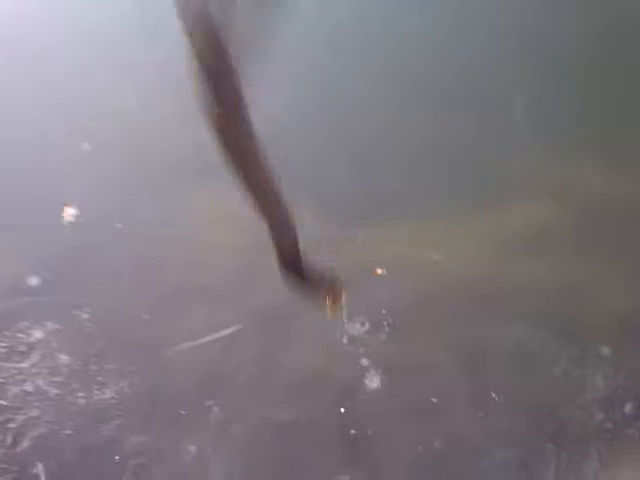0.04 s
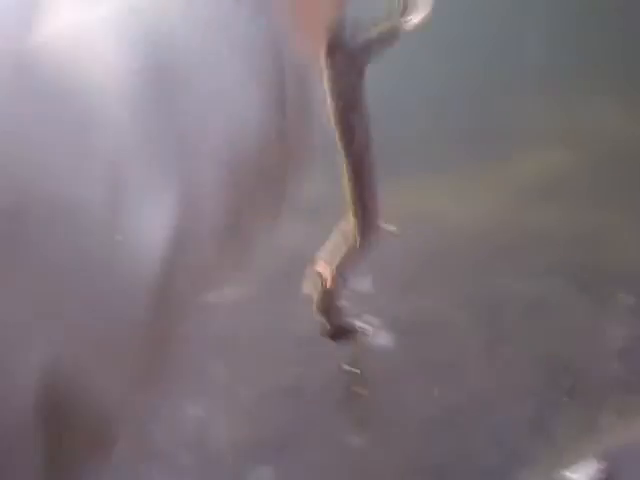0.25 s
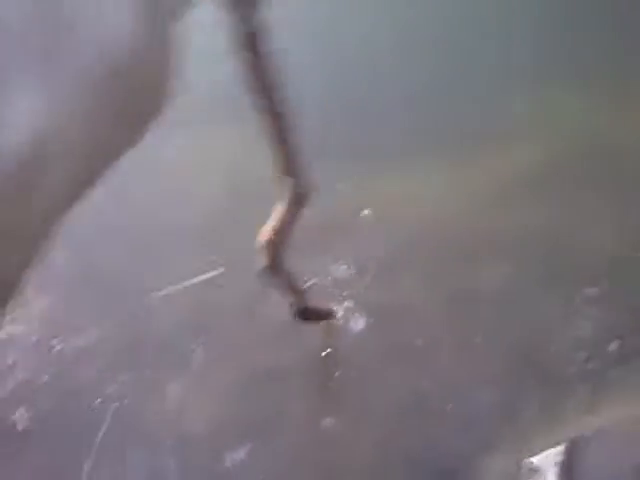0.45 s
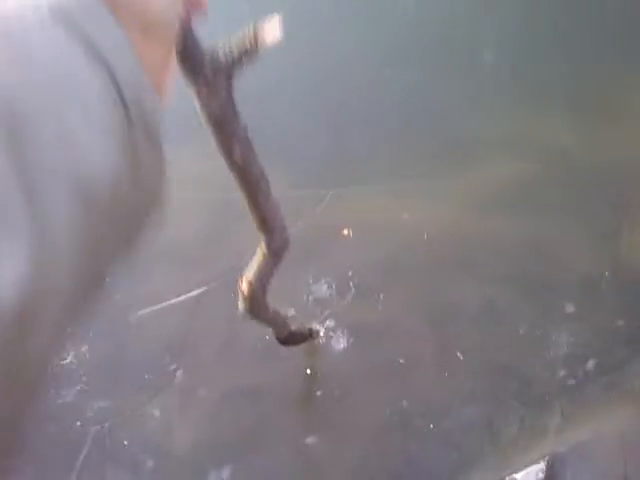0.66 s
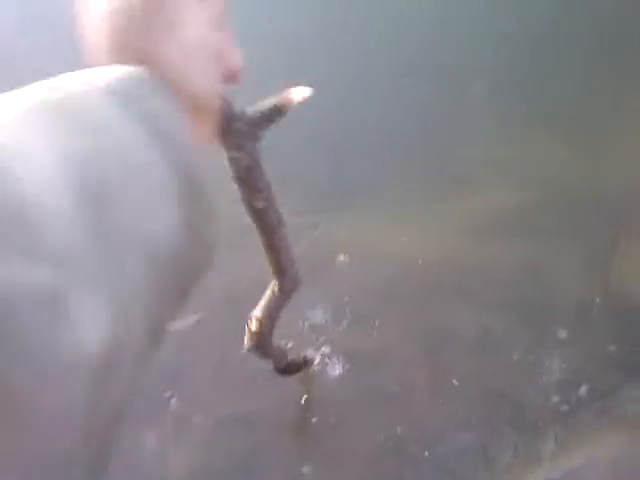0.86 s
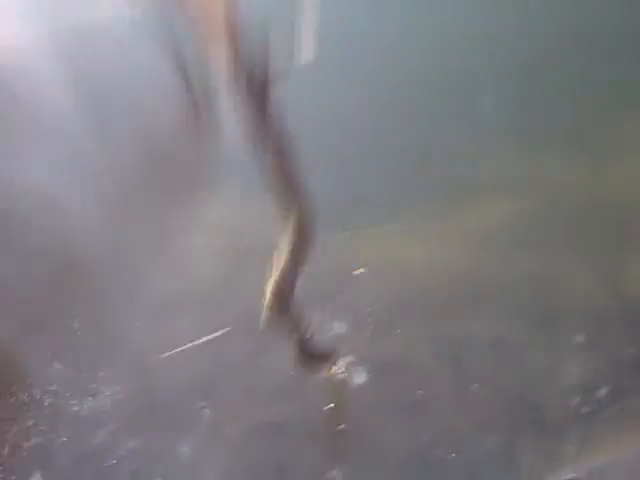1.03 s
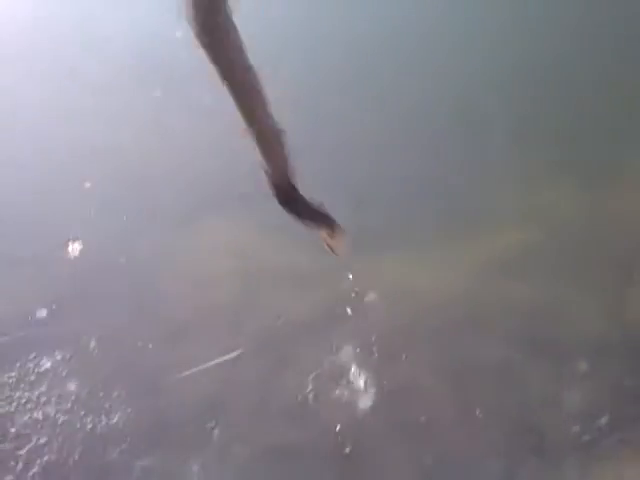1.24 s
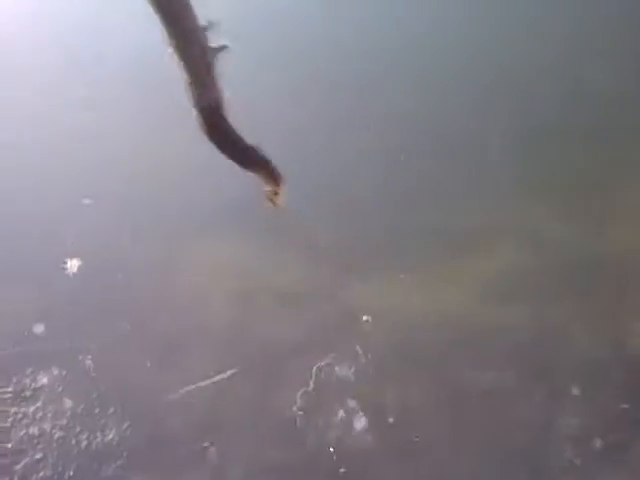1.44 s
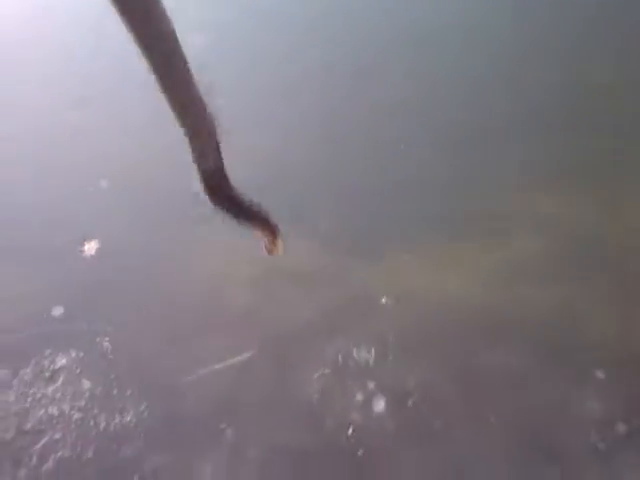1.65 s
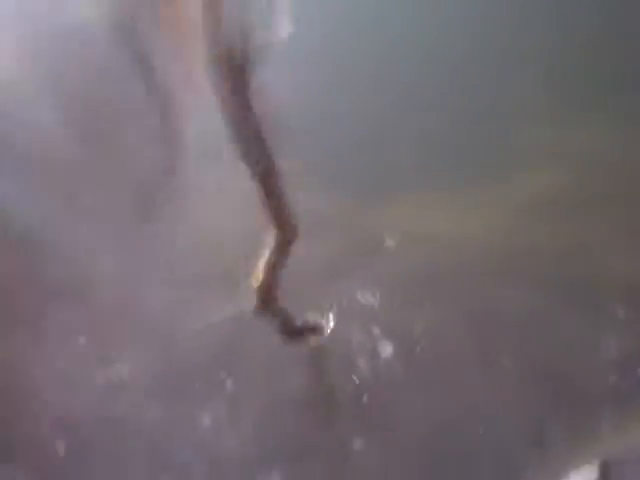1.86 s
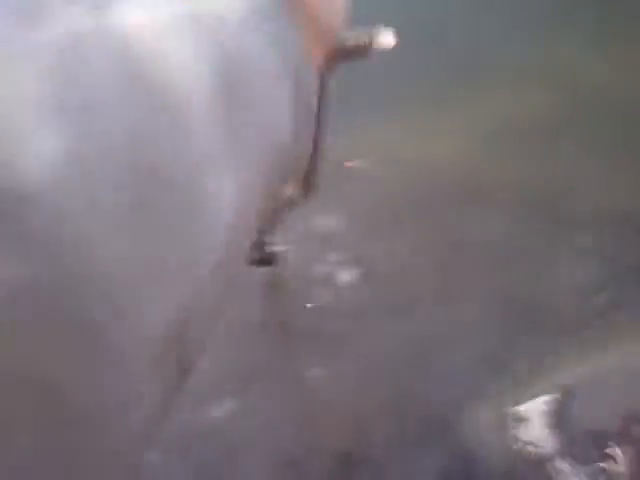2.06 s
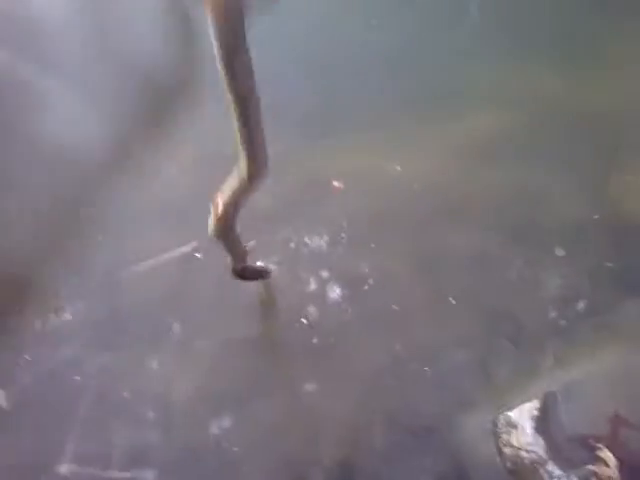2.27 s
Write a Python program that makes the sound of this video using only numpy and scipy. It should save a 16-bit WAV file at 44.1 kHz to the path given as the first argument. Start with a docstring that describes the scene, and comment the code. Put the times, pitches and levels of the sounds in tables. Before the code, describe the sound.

A wooden stick jabs pond ice close by at about 0.2 seconds, with a sharp crack, a knock and a short crunching skid. Loose chips tick faintly afterwards, and a tiny drop lands near 1.4 seconds. A second jab cracks at about 2 seconds, crunching slightly longer with a small bounce. A sleeve rustles softly on and off, over a quiet, steady, distant outdoor rumble.

```python
"""A wooden stick jabs twice at the ice of a pond, close to a small microphone. Each jab cracks the surface,
knocks through stick and ice, then crunches and skids on in the chips. Close by, loose chips tick, the stick
taps lightly once, a drop lands and a sleeve rustles; a low outdoor rumble lies far behind. The surroundings
return a faint, short scatter. The microphone is mono and dull in the top treble."""
import sys
import numpy as np
from scipy import signal
from scipy.fft import rfft, irfft
from scipy.io import wavfile
from scipy.ndimage import uniform_filter1d

SR = 44100
rng = np.random.default_rng(int(sys.argv[2]) if len(sys.argv) > 2 else 0)


def wav_out(sig):
    """Save sig, one row per channel (or a flat mono array), as 16-bit PCM at SR to the path in sys.argv[1]."""
    wavfile.write(sys.argv[1], SR, np.round(np.clip(np.atleast_2d(sig).T, -1, 1) * 32767).astype(np.int16))


N = 105840
TIME, HZ = np.arange(N) / SR, np.fft.rfftfreq(4096, 1 / SR)

# distant outdoor rumble: f/Hz, relative level/dB
RUMBLE_SPECTRUM = [(20, -26.5), (45, -15.5), (75, -3.5), (135, 2), (230, 1.5), (320, -7), (550, -10.5),
                   (850, -4.5), (1100, -9), (1500, -20.5), (2500, -25.5), (4000, -33.5), (5700, -37),
                   (6400, -33), (7200, -35), (8200, -43.5)]
# sleeve rubbing as the arm moves: t/s, level/dB
SLEEVE_LEVELS = [(0, -71.5), (0.07, -69.5), (0.14, -58), (0.3, -59), (0.42, -68.5), (0.72, -70.5),
                 (0.92, -64), (1.08, -63), (1.09, -54.5), (1.123, -51), (1.135, -57), (1.25, -60.5),
                 (1.42, -61), (1.6, -67), (1.78, -69), (1.93, -57.5), (2.14, -56.5), (2.21, -66),
                 (2.32, -65.5), (2.375, -63), (2.4, -54.5)]
# hiss of the cloth: f/Hz, relative level/dB
SLEEVE_SPECTRUM = [(80, -15.5), (400, 2), (1000, -2), (1700, -3.5), (2600, -7), (4200, -13), (5600, -17),
                   (6800, -25), (7800, -29.5)]
# bubbles of one drip: t/s, start f/Hz, rise/(Hz per s), level/dB, length/s
BUBBLES = [(1.4064, 1910, 301000, -44.5, 0.0019), (1.4079, 2690, 400000, -39, 0.0027),
           (1.4095, 3700, 400000, -50.5, 0.0024), (1.4113, 3230, 150000, -50, 0.0032)]
# loose chips ticking, and near 0.86 s a light tap of the stick: t/s, level/dB, centre f/Hz, half-width/octaves,
# length/s
CHIP_TICKS = [(0.472, -65.5, 3520, .4, 0.0045), (0.492, -56.5, 3710, 0.35, 0.0013),
              (0.61, -70, 3500, .4, .005), (0.813, -66, 3320, 0.63, 0.0071),
              (0.8590, -52, 2820, 0.51, 0.0057), (0.8600, -49.5, 1044, 0.44, 0.0097),
              (0.955, -60, 3080, 0.41, 0.0028), (1.0873, -61, 4330, 0.18, 0.0076),
              (1.0894, -52.5, 1630, 0.26, 0.0078), (1.1130, -55, 2460, 0.48, 0.0071),
              (1.4670, -66, 4600, .4, 0.0046), (1.4950, -64, 2940, 0.77, 0.0096),
              (2.295, -55.5, 5470, 0.99, .002), (2.2977, -49.5, 970, .9, 0.0035)]
# the surface cracking: t/s, length/s, level/dB, change over the burst/dB, tilt/(dB per octave), shard f/Hz
ICE_CRACKS = [(0.2213, .0035, -24, 2.5, 5.5, 6300), (1.9765, .005, -22, -2, -0.5, 5320)]
# a crack before its tilt and shard ring: f/Hz, relative level/dB
CRACK_SPECTRUM = [(60, -8), (200, 0), (500, -12.5), (900, -4), (1500, -4.5), (3500, 2), (5200, -9.5),
                  (6000, -16), (6900, -23), (8000, -23.5)]
# the tip grinding through chips: t/s, length/s, level/dB, change over the burst/dB, tilt/(dB per octave)
TIP_CRUNCHES = [(0.2236, 0.0092, -30, 2, 3), (0.235, 0.0065, -26, -4.5, 0), (0.242, 0.022, -38.5, -7, 0.5),
                (0.2634, 0.0072, -34.5, -10, 0), (0.269, .014, -49, -12, -2.5),
                (0.2857, .006, -49.5, -21, 4), (0.334, 0.009, -49.5, -11, 1.5), (1.981, .019, -27.5, 0, -1),
                (2.0031, 0.0082, -31, -6, 0), (2.0083, 0.017, -36.5, 2, -1.5), (2.022, .009, -31, 5, 1),
                (2.032, 0.0081, -32.5, 2, -0.5), (2.0398, 0.014, -38.5, -6, 2),
                (2.055, .030, -45.5, -9, -2), (2.0834, 0.011, -37, -10, -1)]
# a crunch before its tilt: f/Hz, relative level/dB
CRUNCH_SPECTRUM = [(50, -23), (150, -15.5), (280, -7.5), (480, -3.5), (680, -3.5), (920, 0), (1150, 1.5),
                   (1400, -3), (1750, 1), (2200, -4.5), (2700, -7.5), (3400, -6), (4600, -13),
                   (5800, -23.5), (6800, -30), (8000, -35)]
# dull knocks of the flexing stick: t/s, f/Hz, level/dB, t60/s
FLEX_THUDS = [(0.230, 481, -30, .055), (0.301, 180, -29.5, 0.031), (1.988, 490, -30, .04),
              (2.045, 355, -37, .06)]
# modes of stick on ice: base f/Hz, square-hit level/dB, glancing level/dB, t60/s
STICK_ICE_MODES = [(197, -23.5, -23.5, .024), (463, -18.5, -45, 0.03), (814, -31, -7, 0.024),
                   (1130, -7.5, -4, 0.021), (1568, 2, -2, .009), (1906, -0.5, -1, 0.013),
                   (2522, -9, -12, .013), (3200, -20.5, -15, 0.0088), (3676, -12.5, -11, .012),
                   (4930, -17.5, -14, 0.01)]
# two jabs and a bounce: t/s, level/dB, pitch factor, time until the ice gives/s, rebound/dB, glancing 0-1
JABS = [(0.223, -6.5, 0.96, .0029, -14, 0), (1.9773, -13, 1, .00135, -2.5, 0.68),
        (2.0835, -35, 0.95, .0038, -4, 0.8)]
# the microphone's fall in the top treble: f/Hz, relative level/dB
MIC_RESPONSE = [(6700, 1), (7200, -8), (7900, -16), (8800, -24)]


def amp(db):
    """Decibels to gain."""
    return 10 ** (np.asarray(db) / 20)


def unit_rms(x):
    """Scales to an rms of one."""
    return x / np.sqrt(np.mean(x ** 2) + 1e-20)


def add(mix, start, sound):
    """Mixes a sound in at a time in seconds."""
    part = mix[round(start * SR):][:len(sound)]
    part += sound[:len(part)]


def colour(points, tilt=0):
    """A spectrum in dB from its points, tilted per octave."""
    hz, db = np.transpose(points)
    octave = np.log2(HZ + 10)
    return np.interp(octave, np.log2(hz), db) + tilt * octave


def shaped(x, db):
    """Passes x through a minimum-phase filter with this spectrum, its peak set to 0 dB."""
    gain = amp(np.maximum(db - db.max(), -90))
    cepstrum = irfft(np.log(gain))
    half = len(cepstrum) // 2
    cepstrum[1:half] *= 2
    cepstrum[half + 1:] = 0
    impulse = irfft(np.exp(rfft(cepstrum)))[:half]
    return signal.fftconvolve(x, impulse)


def noise(points):
    """Steady noise of one colour."""
    return unit_rms(shaped(rng.standard_normal(N), colour(points))[:N])


def waver(samples):
    """A random wander, smoothed over this many samples."""
    return unit_rms(uniform_filter1d(rng.standard_normal(N), size=samples))


def fractures(length, db, change_db, spectrum, clicks_per_s=8000, spread_db=2):
    """Tiny breaks in ice: a burst of uneven clicks that together hold a given level."""
    n = max(round(length * SR), 8)
    chance, size, sign = rng.random((4096, 3))[:n].T
    strength = amp(-spread_db * np.log(np.maximum(size, .05)))
    clicks = (chance < clicks_per_s / SR) * np.sign(sign - .5) * strength
    clicks[0] = 1
    burst = shaped(clicks * amp(change_db * np.linspace(0, 1, len(clicks))), spectrum)
    return amp(db) * np.sqrt(n) * burst / np.linalg.norm(burst)


def distant_rumble(level_db=-56.5, waver_db=0.5):
    """The open air far from the microphone: low and gently wavering."""
    return amp(level_db + waver_db * waver(5000)) * noise(RUMBLE_SPECTRUM)


def pond_scatter(near, level_db=-19, t60=0.16):
    """The pond's surroundings return a faint, short tail of the close sounds."""
    t = TIME[:SR // 2]
    tail = rng.standard_normal(len(t)) * amp(-60 * t / t60)
    return amp(level_db) * signal.fftconvolve(near, tail / np.linalg.norm(tail))[:N]


def sleeve(grain_db=1.5):
    """Cloth rubs on the moving arm: a grainy hiss that swells and sinks."""
    grain = amp(grain_db * waver(130))
    movement = amp(np.interp(TIME, *np.transpose(SLEEVE_LEVELS)))
    return movement * unit_rms(noise(SLEEVE_SPECTRUM) * grain)


def drip():
    """A drop lands nearby and its tiny bubbles chirp upwards."""
    out = np.zeros(N)
    for start, hz, rise, db, length in BUBBLES:
        t = np.arange(0, length, 1 / SR)
        swell = np.sin(np.pi * t / length) ** 2
        add(out, start, amp(db) * swell * np.sin(2 * np.pi * (hz + rise * t / 2) * t))
    return out


def loose_chips(fade_db=-7):
    """Chips of ice tick near the microphone, each in a band of its own; near 0.86 s the stick taps lightly."""
    out = np.zeros(N)
    for start, db, hz, width, length in CHIP_TICKS:
        octaves_off = np.log2((HZ + 10) / hz)
        band = -20 * np.log10(1 + (octaves_off / width) ** 4)
        add(out, start, fractures(length, db, fade_db, band))
    return out


def breaking_ice(shard_db=11, shard_width_hz=210):
    """Close up, a bright crack with ringing shards at contact, then duller crunches as the tip skids."""
    out = np.zeros(N)
    for start, length, db, change_db, tilt, hz in ICE_CRACKS:
        shards = shard_db * np.exp(-((HZ - hz) / shard_width_hz) ** 2)
        add(out, start, fractures(length, db, change_db, colour(CRACK_SPECTRUM, tilt) + shards))
    for start, length, db, change_db, tilt in TIP_CRUNCHES:
        add(out, start, fractures(length, db, change_db, colour(CRUNCH_SPECTRUM, tilt)))
    return out


def stick_knocks(thud_rise_s=0.0067):
    """Close up, the tip loads the ice and rings the modes; the flexing stick adds dull thuds."""
    out, t = np.zeros(N), TIME[:SR // 8]
    for start, db, pitch, give_s, rebound_db, glancing in JABS:
        ring = np.zeros(len(t))
        for k, (hz, square_db, glance_db, t60) in enumerate(STICK_ICE_MODES):
            mode_db = db + square_db + glancing * (glance_db - square_db)
            ring += (-1) ** k * amp(mode_db - 60 * t / t60) * np.sin(2 * np.pi * hz * pitch * t)
        add(out, start, ring)
        add(out, start + give_s, -amp(rebound_db) * ring)  # the ice gives way: the same ring, inverted
    for start, hz, db, t60 in FLEX_THUDS:
        envelope = np.minimum(t / thud_rise_s, 1) * amp(db - 60 * t / t60)
        add(out, start, envelope * np.sin(2 * np.pi * hz * t))
    return out


def scene():
    """At the pond: stick and ice close to the microphone, open air behind."""
    near = stick_knocks() + breaking_ice() + loose_chips() + drip()
    return (near + pond_scatter(near) + sleeve() + distant_rumble())[None]


def record(dry):
    """The small microphone dulls the top treble and the recorder's narrow band cuts it off."""
    heard = shaped(dry[0], colour(MIC_RESPONSE))[:N]
    edge_hz = 8200
    lowpass = signal.firwin(255, edge_hz, window=("kaiser", 9), fs=SR)
    return signal.oaconvolve(heard, lowpass, "same")[None]


dry = scene()
out = record(dry)
wav_out(out)
```